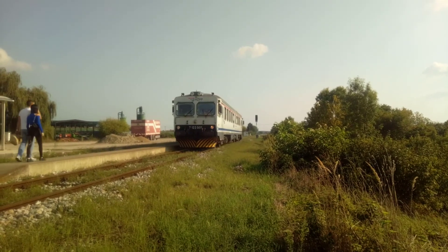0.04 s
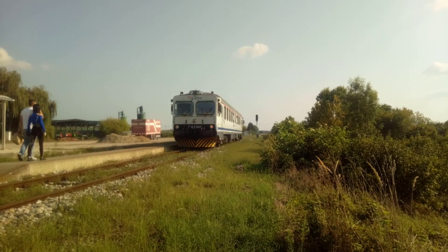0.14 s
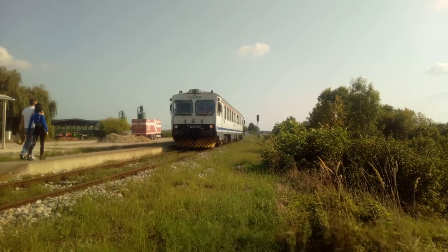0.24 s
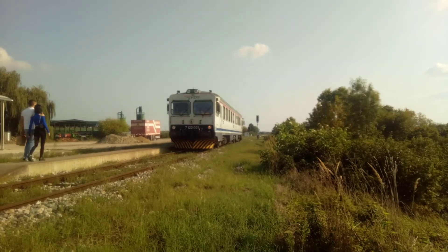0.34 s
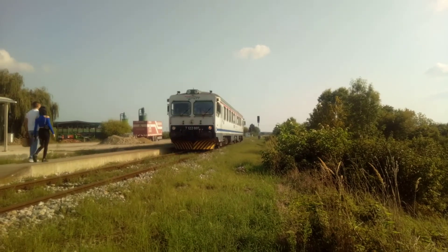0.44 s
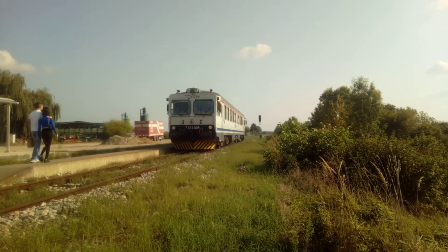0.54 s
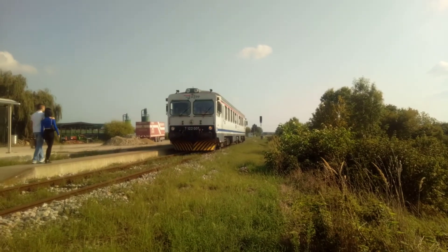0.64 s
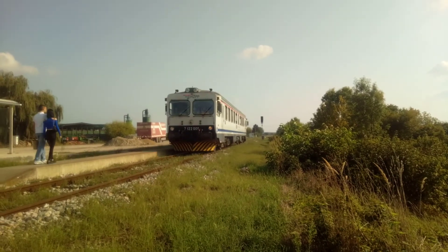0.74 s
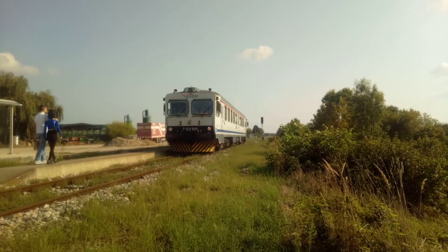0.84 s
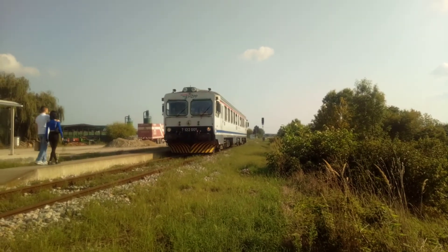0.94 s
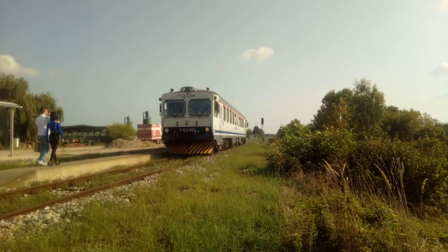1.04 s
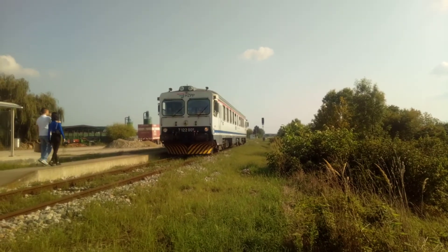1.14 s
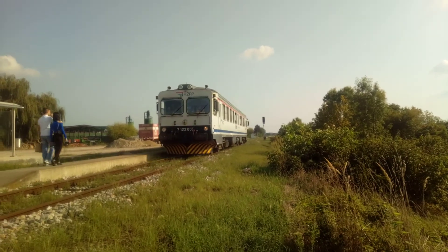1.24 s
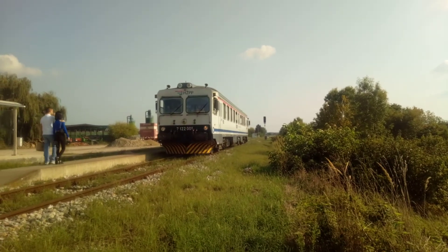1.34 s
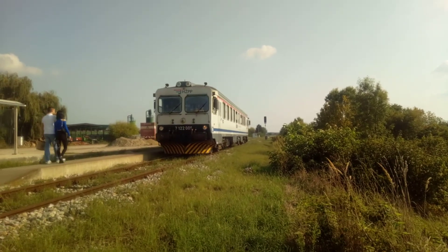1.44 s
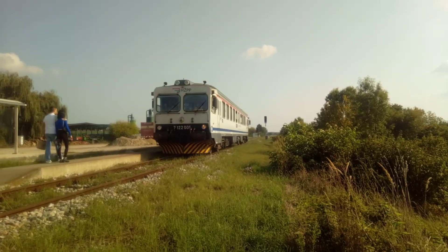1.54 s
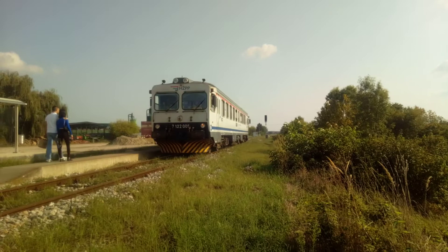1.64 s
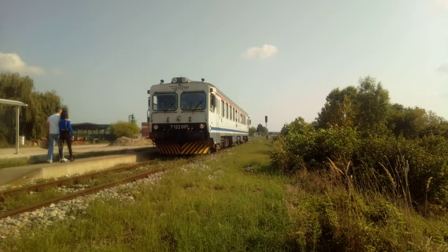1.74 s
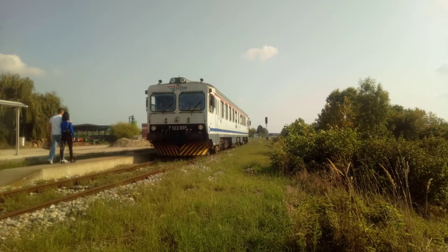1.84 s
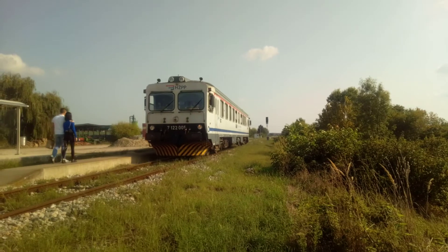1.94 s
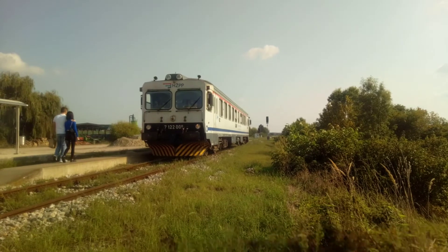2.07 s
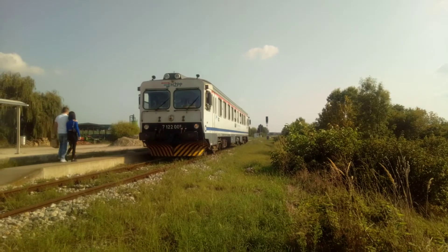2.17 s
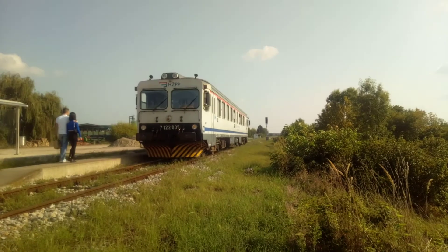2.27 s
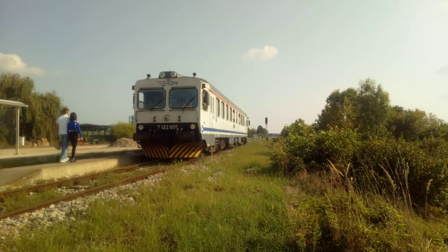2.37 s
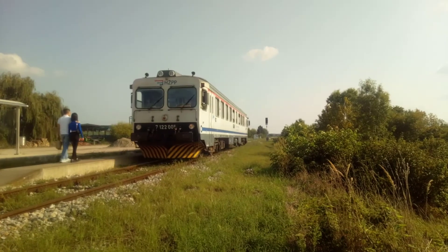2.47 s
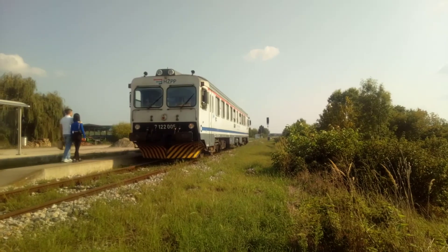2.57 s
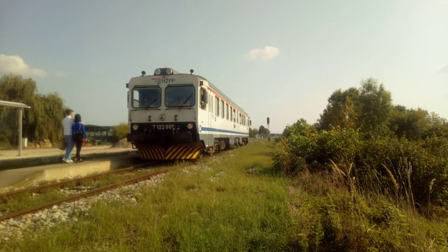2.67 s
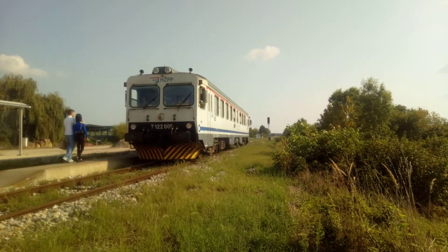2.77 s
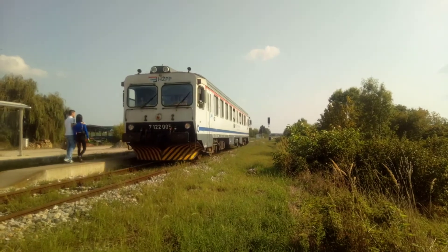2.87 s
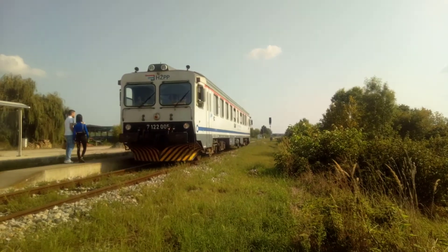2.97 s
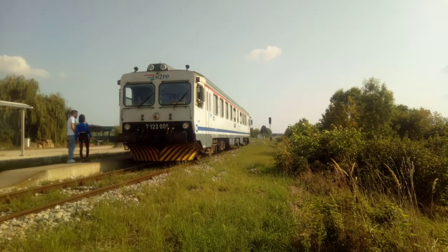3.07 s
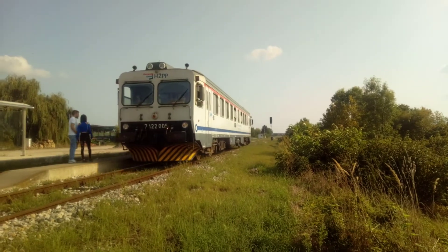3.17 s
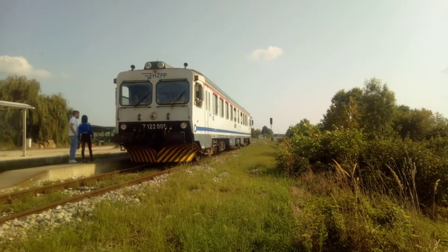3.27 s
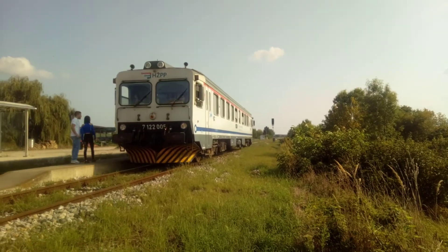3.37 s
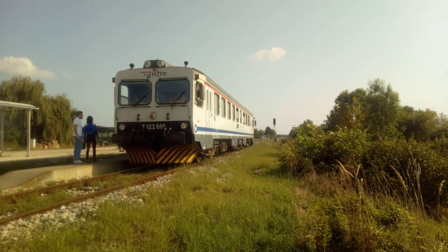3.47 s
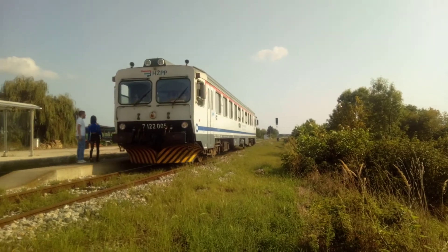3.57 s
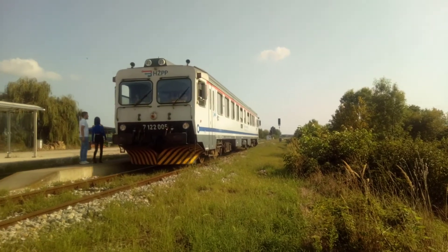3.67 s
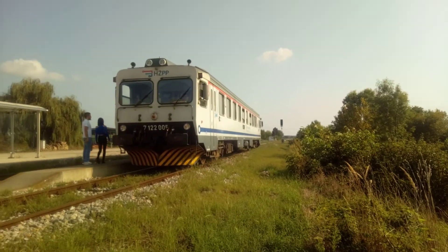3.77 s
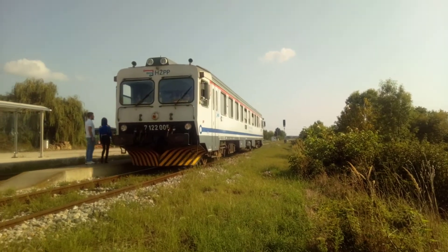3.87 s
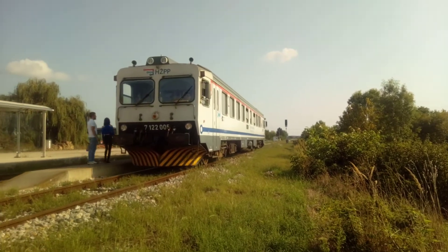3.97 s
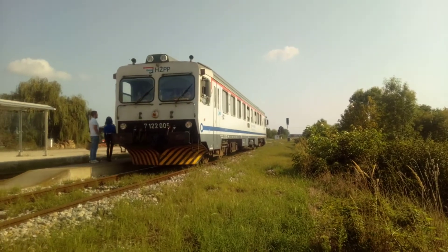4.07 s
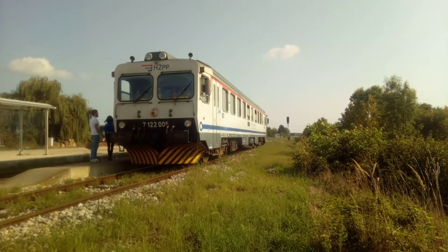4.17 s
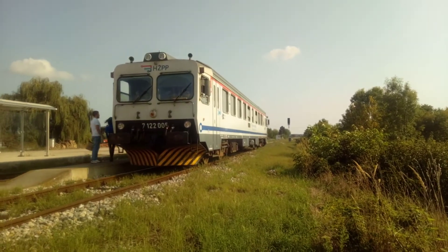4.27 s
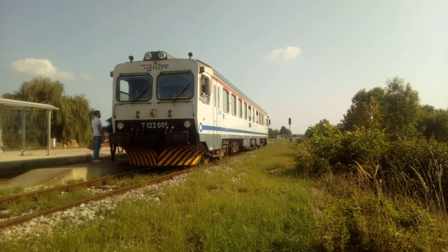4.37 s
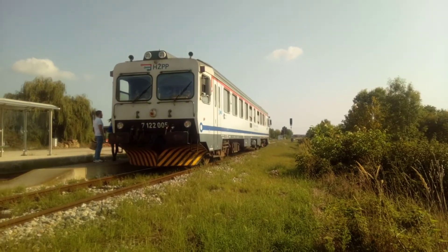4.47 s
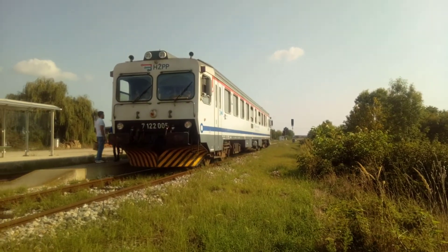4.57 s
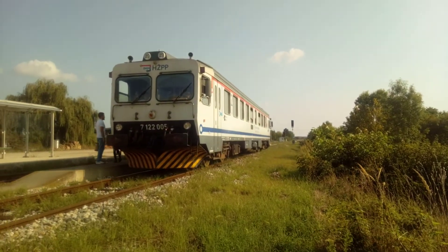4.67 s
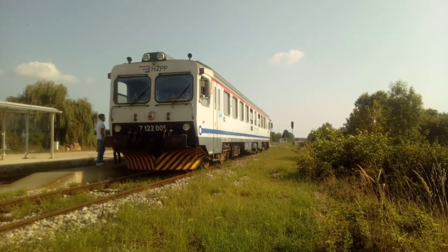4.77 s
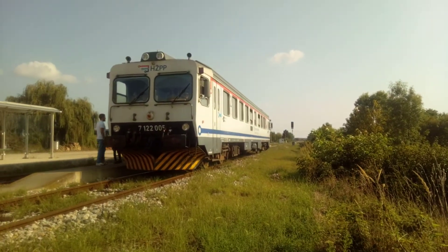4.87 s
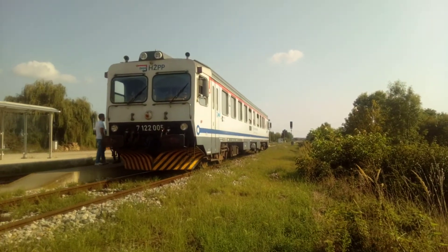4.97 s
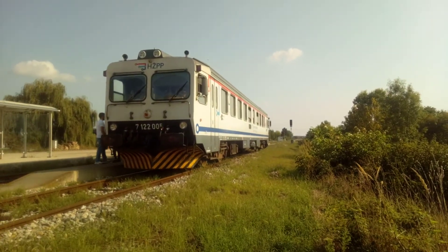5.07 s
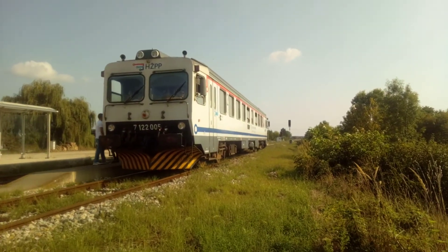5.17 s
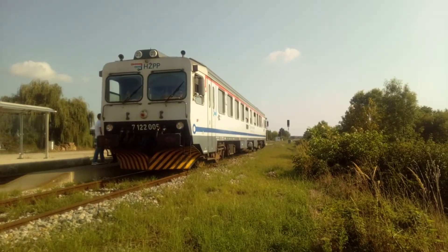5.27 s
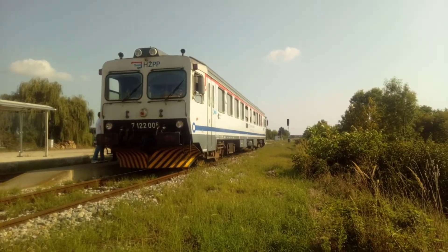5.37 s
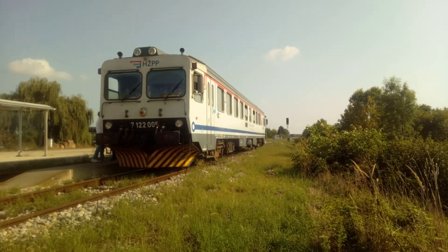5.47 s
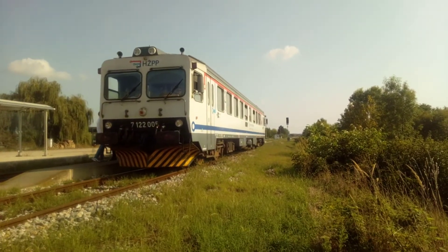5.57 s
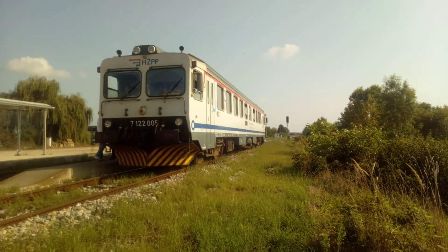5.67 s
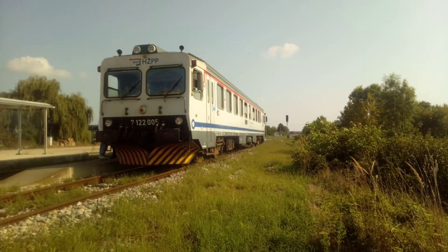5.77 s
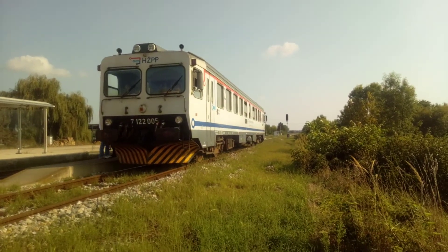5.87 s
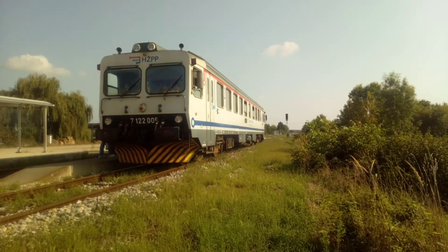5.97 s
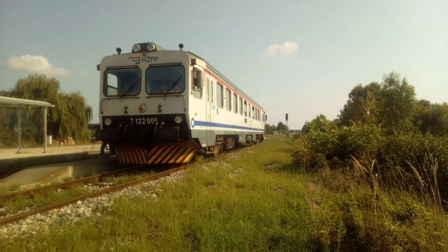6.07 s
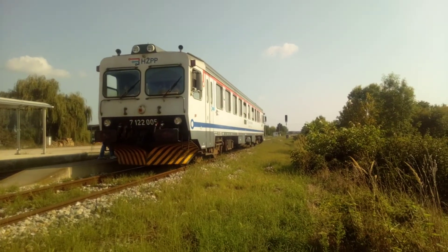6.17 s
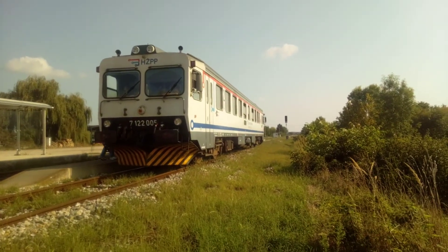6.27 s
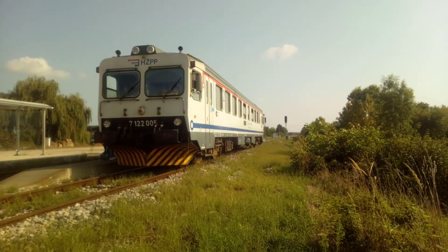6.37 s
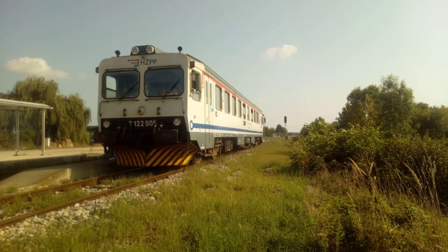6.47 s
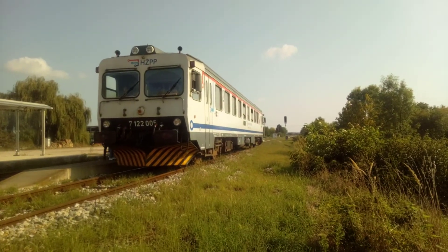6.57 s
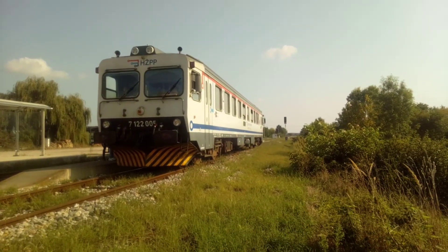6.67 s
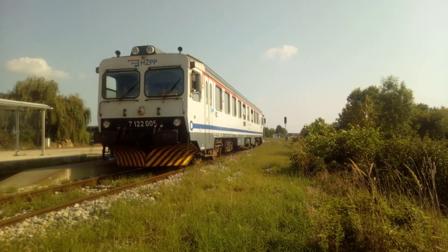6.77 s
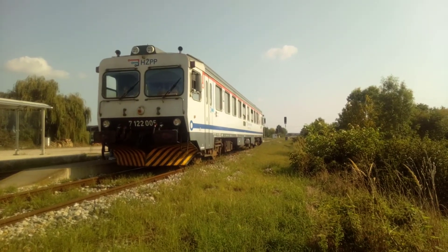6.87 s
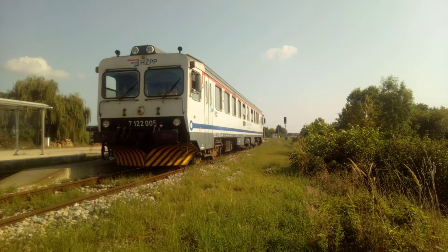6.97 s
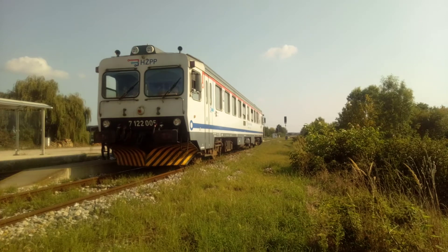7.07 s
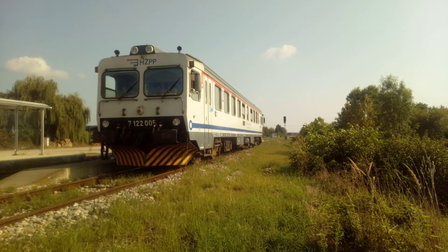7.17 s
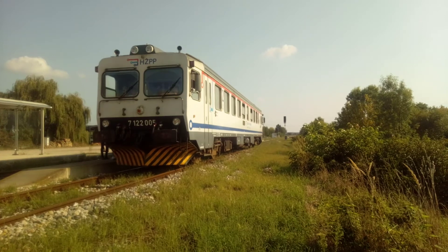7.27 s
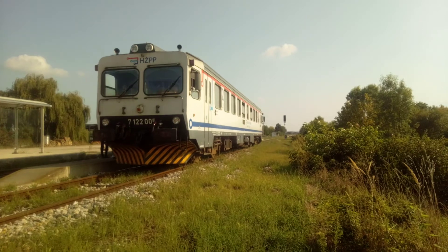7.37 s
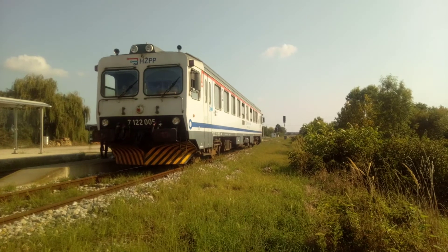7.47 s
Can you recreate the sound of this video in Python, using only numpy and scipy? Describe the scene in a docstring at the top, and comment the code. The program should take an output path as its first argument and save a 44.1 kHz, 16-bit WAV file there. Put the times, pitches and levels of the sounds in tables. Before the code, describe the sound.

Low throbbing diesel engines beneath a harsh, shrill brake squeal that swells, flutters and stops abruptly, leaving fading hiss and a steady hum.

```python
"""Friction-driven squeal of a braking railcar

A diesel railcar rolls up to a country platform, heard from the grass beside the track. Its two engines
run throughout: firing pulses and filtered noise, with a hum of shaft multiples and a thin whine.
Brake blocks ring steel modes with noisy slips and set the wheels squealing as beating tones with
overtones and rasp; moans and short squawks join in, and bleeding air hisses as coloured noise.
Two dull thumps ring low modes during the approach, and dry stalks crack close by as noise bursts."""
import sys
import numpy as np
from scipy import signal
from scipy.fft import rfft, irfft, next_fast_len
from scipy.io import wavfile

SR = 44100
rng = np.random.default_rng(int(sys.argv[2]) if len(sys.argv) > 2 else 0)


def store_pcm(level_fs):
    """Save levels as 16-bit WAV."""
    pcm = np.round(np.clip(level_fs, -1, 1) * 32767).astype(np.int16)
    wavfile.write(sys.argv[1], SR, np.atleast_2d(pcm).T)


N = 331191
T = np.arange(N) / SR
TOP_HZ = 15750  # upper band limit


def undb(db):
    """Logarithmic level: decibels to amplitude gain."""
    return 10 ** (np.asarray(db) / 20)


def curve(rows, axis=1):
    """Linear interpolation: one column of a table, joined by straight lines in time."""
    rows = np.asarray(rows, float)
    return np.interp(T, rows[:, 0], rows[:, axis])


def unit(x):
    """Normalisation: scale to rms 1."""
    return x / np.sqrt(np.mean(np.abs(x) ** 2))


def shape(x, response):
    """Linear filtering: multiply the spectrum by a gain that is a function of frequency."""
    size = next_fast_len(N, True)
    hz = np.arange(size // 2 + 1) * SR / size + 1e-3
    return irfft(rfft(x, size) * response(hz), size)[:N]


def colour(x, points):
    """Spectral envelope: filter by (f/Hz, level/dB) points on a logarithmic f axis; rms 1."""
    hz, db = np.transpose(points)
    return unit(shape(x, lambda f: undb(np.interp(np.log(f), np.log(hz), db))))


def resonance(f, hz, width):
    """Damped oscillator: complex gain of one resonance, 1 at its centre."""
    return 1 / (1 + 1j * (f * f - hz * hz) / (f * width))


def walk(rate):
    """Band-limited chance: random values, `rate` per second, joined by lines; rms 1."""
    steps = rng.standard_normal(int(N / SR * rate) + 4)
    return unit(np.interp(T * rate + rng.random(), np.arange(len(steps)), steps))


def scatter(width_hz, skirt_hz):
    """Random excitation: wandering size and phase of a tone, as low-passed complex noise; rms 1."""
    z = rng.standard_normal(N) + 1j * rng.standard_normal(N)
    for hz in (width_hz / 2, skirt_hz, skirt_hz):
        z = signal.lfilter([1], [1, -np.exp(-2 * np.pi * hz / SR)], z)
    return unit(z)


def turn(hz):
    """Phase accumulation: running phase of a frequency curve."""
    return 2 * np.pi * np.cumsum(hz) / SR


def tone(phase, size=1):
    """Phasor rotation: a sine of rms 1, times a real or complex size."""
    return np.sqrt(2) * np.real(size * np.exp(1j * phase))


SWELL_EDGE = 2.1  # higher gives a flatter top and steeper flanks


def swell(centre_s, length_s):
    """Bell envelope: a rounded rise and fall, 1 at its centre and 0.61 at the ends of its length."""
    return np.exp(-np.abs(2 * (T - centre_s) / length_s) ** SWELL_EDGE / 2)


def underframe(x):
    """Multipath interference: short echoes among steel parts cut fine peaks and notches into a noise."""
    t = T[:SR // 25]
    echoes = rng.standard_normal(len(t)) * np.exp(-t / .015)
    return x + undb(-6.5) * signal.fftconvolve(x, echoes / np.linalg.norm(echoes))[:N]


# exhaust level, for the weighted sum of thud and rumble: t/s, level/dB
ENGINE_LEVEL = [(0, -46), (2.2, -47), (2.8, -49), (7.5, -49.5)]
# relative spectrum of the exhaust rumble: f/Hz, level/dB
ENGINE_COLOUR = [(20, -25), (31, 0.5), (42, -12), (62, 5.5), (80, 6), (105, -2), (140, 1), (215, -3),
                 (270, -9.5), (360, -17.5), (480, -23), (800, -27), (2000, -57)]


def exhaust(cycle):
    """Periodic impulses: six unequal cylinders thud through the silencer over a noisy rumble."""
    fired = np.flatnonzero(np.diff(np.floor(cycle)))
    cylinders_db = np.array([-1.5, -3.5, -1.5, -10.5, -0.5, 1.5])
    firing_db = cylinders_db[np.arange(len(fired)) % len(cylinders_db)]
    pulses = np.zeros(N)
    pulses[fired] = undb(firing_db + 0.67 * rng.standard_normal(len(fired)))
    # the silencer leaves only the lowest few multiples of the firing rate
    thud = unit(shape(pulses, lambda f: resonance(f, 72, 60) ** 2))
    thud_db = -8 + np.interp(T, [5, 5.7], [0, -4])
    rumble = colour(rng.standard_normal(N) * undb(2.0 * walk(24)), ENGINE_COLOUR)
    return undb(curve(ENGINE_LEVEL)) * (undb(thud_db) * thud + undb(0.9) * rumble)


# partials of the second engine's hum: multiple of the shaft rate, level/dB before the swell
HUM = [(5, -70), (6.5, -63.5), (7, -64), (9, -72.5), (10, -78.5), (12, -54), (13, -56.5), (16, -62.5),
       (17, -62.5), (26, -66.5)]
# gain over the whole hum: t/s, level/dB
HUM_SWELL = [(0, -5), (4.4, -14), (5.2, -8), (5.7, 0.5), (7.5, 1)]
SHAFT_HZ, HUM_WAVER_DB = 12.59, 1.6


def hum():
    """Harmonic series: the second engine sounds whole and half multiples of its shaft rate."""
    shaft = turn(SHAFT_HZ * (1 + 0.0021 * walk(5)))
    partials = 0
    for k, db in HUM:
        phase = round(2 * k) / 2 * shaft + 2 * np.pi * rng.random()
        partials += undb(db + HUM_WAVER_DB * walk(4)) * tone(phase)
    return undb(curve(HUM_SWELL)) * partials


# engine clatter: t/s, level/dB
CLATTER = [(0, -50.5), (1.0, -49), (2.3, -47.5), (2.7, -52.5), (5.1, -54), (5.7, -53), (7.5, -54.5)]
# its relative spectrum: f/Hz, level/dB
CLATTER_COLOUR = [(250, -23), (450, -6.5), (750, 1), (900, -4), (1070, 3), (1350, -4), (1570, 1),
                  (2200, -7.5), (2700, -9), (3600, -10), (4500, -13), (6600, -19), (8200, -37), (9700, -36),
                  (13700, -44.5), (15000, -18)]


def clatter(cycle):
    """Amplitude modulation: noise jumps up at each firing and decays within the cycle."""
    gate = (1 + 0.44 * np.exp(-(cycle % 1) / 0.236)) * undb(0.67 * walk(9))
    noise = underframe(rng.standard_normal(N) * gate)
    return undb(curve(CLATTER)) * colour(noise, CLATTER_COLOUR)


# thin whine of the engine: t/s, f/Hz, level/dB
WHINE = [(0, 2706, -65), (1.8, 2670, -53), (2.4, 2672, -63), (5.5, 2637, -60.5), (7.5, 2645, -68.5)]


def whine():
    """Narrow-band noise: a gliding tone of wandering size and phase."""
    return undb(curve(WHINE, axis=2)) * tone(turn(curve(WHINE)), scatter(width_hz=67, skirt_hz=220))


# mean firing rate of the main engine: t/s, f/Hz
FIRING_RATE = [(0, 30.02), (4.8, 30.45), (5.6, 32.33), (7.5, 31.8)]


def engines():
    """Common periodicity: one firing cycle drives exhaust and clatter; hum and whine run beside it."""
    cycle = np.cumsum(curve(FIRING_RATE) * (1 + 0.0043 * walk(4))) / SR
    return exhaust(cycle) + hum() + clatter(cycle) + whine()


# relative spectrum of the escaping air: f/Hz, level/dB
AIR_COLOUR = [(1500, -9), (2650, -7), (3300, -1.5), (4500, -9.5), (5600, -2), (6000, 3.5), (6300, -3),
              (6650, 2), (7200, -9), (8200, -14), (9000, -8.5), (10400, -13.5), (11800, -4), (13700, -8),
              (14700, 4), (15700, -3.5)]
AIR_FULL_S, AIR_ATTACK_S = 5.28, .3  # time of full opening, and the rise before it
AIR_DB, AIR_FALL_DB_PER_S = -45.5, 9.5


def air():
    """Turbulent jet noise: a thin hiss that sinks with the pressure in the brake pipe."""
    since = T - AIR_FULL_S
    opening = np.clip(1 + since / AIR_ATTACK_S, 0, 1)
    db = AIR_DB - AIR_FALL_DB_PER_S * np.maximum(since, 0) + 0.32 * walk(14)
    return opening * undb(db) * colour(underframe(rng.standard_normal(N)), AIR_COLOUR)


# grass brushing close by: t/s, level/dB
RUSTLE = [(0, -100), (7.42, -100), (7.436, -46), (7.51, -49.5)]


def rustle():
    """Random excitation: grass brushes as fluttering coloured noise."""
    spectrum = [(40, -11), (130, 0), (450, 4), (1200, 3), (3500, -4), (9000, -18.5), (15000, -17)]
    grass = colour(rng.standard_normal(N) * undb(1.9 * walk(250)), spectrum)
    return undb(curve(RUSTLE)) * grass


# dull thumps: t/s, peak level/dB, push length/s
THUMPS = [(1.147, -33, 0.0035), (1.16, -22, 0.001), (1.199, -36, .003), (1.212, -33, 0.0016),
          (1.996, -18, 0.0015), (2.036, -25.5, 0.0014)]
# the low modes they ring: f/Hz, relative level/dB, t60/s
THUMP_MODES = [(121.5, -0.5, 0.34), (141, 1.5, 0.19), (223.3, -9, 0.45), (278, 4, 0.12), (410, -17, .07)]


def thumps():
    """Impulse response: soft pushes ring low, decaying modes."""
    out, t = np.zeros(N + SR), T[:SR // 3]
    ring = sum(undb(db - 60 * t / t60) * np.sin(2 * np.pi * hz * t) for hz, db, t60 in THUMP_MODES)
    for s, db, push in THUMPS:
        blow = signal.fftconvolve(ring, np.exp(-np.pi * t / push))[:len(t)]
        out[int(s * SR):][:len(t)] += undb(db) * blow / np.abs(blow).max()
    return out[:N]


# cracks and scuffs close by: t/s, peak level/dB, ring f/Hz, t60/s
CRACKS = [(.196, -32.5, 2750, 0.003), (.228, -29.5, 1880, 0.0079), (0.232, -31, 1690, 0.0096),
          (.242, -40, 2000, 0.018), (.248, -38, 2180, .008), (1.129, -32.5, 1000, 0.075),
          (1.143, -35, 620, 0.12), (1.161, -30.5, 320, 0.29), (1.995, -27, 1480, 0.077),
          (2.026, -31, 1300, 0.034), (4.478, -33, 420, 0.036), (5.526, -29.5, 3100, 0.0097),
          (5.561, -22.5, 1470, 0.02), (5.564, -27.5, 1410, .012), (7.48, -28, 2640, 0.013)]


def cracks():
    """Transient excitation: dry stalks snap as decaying noise through one broad resonance."""
    out, t = np.zeros(N + SR), T[:SR // 3]
    for s, db, hz, t60 in CRACKS:
        burst = rng.standard_normal(len(t)) * undb(-60 * t / t60)
        snap = signal.lfilter(*signal.iirpeak(hz, 1.2, fs=SR), burst)
        # low scuffs carry no treble
        snap = signal.lfilter(*signal.butter(2, min(5 * hz, TOP_HZ), fs=SR), snap)
        out[int(s * SR):][:len(t)] += undb(db) * snap / np.abs(snap).max()
    return out[:N]


# moans of the bogie under braking: centre t/s, length/s, f/Hz, level/dB before MOAN_LIFT_DB
MOANS = [(3.04, 0.14, 1032, -41.5), (3.4, 0.23, 1024, -43.5), (3.963, 0.37, 1053, -40),
         (4.467, 0.16, 1157, -45.5), (4.62, 0.11, 1073, -37.5), (4.92, 0.37, 1033, -39.5),
         (5.212, 0.09, 1022, -42)]
MOAN_LIFT_DB = 2.0


def moan():
    """Low-mode friction vibration: the bogie moans in rough, swelling tones."""
    out = 0
    for s, length, hz, db in MOANS:
        rough_tone = tone(2 * np.pi * hz * T, scatter(width_hz=56, skirt_hz=139))
        out += undb(db + MOAN_LIFT_DB) * swell(s, length) * rough_tone
    return out


# short squawks: centre t/s, length/s, f/Hz at the centre, level/dB before roughening
SQUAWKS = [(3.01, .14, 790, -41), (5.02, .17, 775, -34), (5.09, .11, 725, -39), (5.02, .13, 1560, -36.5),
           (5.01, .17, 2662, -28.5), (5.02, .18, 3560, -30.5), (5.02, .13, 5222, -31),
           (5.02, .13, 6230, -35), (5.27, .25, 668, -45.5), (5.28, .15, 6126, -37.5), (5.2, .14, 2226, -35)]


def squawk():
    """Stick-slip oscillation: single modes squawk as the blocks start to stick."""
    out = np.zeros(N)
    waver, rough = walk(45), 0.6 + 0.6 * scatter(width_hz=50, skirt_hz=157)
    for k, (s, length, hz, db) in enumerate(SQUAWKS):
        i = np.flatnonzero(np.abs(T - s) < length / 2)
        own = (i + k * len(i)) % N  # each reads its own stretch of the waver
        pitch = hz * (1 - 0.07 * (T[i] - s)) + 9 * waver[own]  # sags as the wheel slows
        envelope = np.cos(np.pi * (T[i] - s) / length)
        out[i] += undb(db) * envelope * tone(turn(pitch), rough[own])
    return out


# the brake blocks are pressed on twice: on t/s, off t/s
BRAKINGS = [(.5, 1.98), (2.38, 5.33)]
BITE_S, RELEASE_S, RELEASED_DB = 0.045, .16, -7  # overtones, rasp and rubbing drop while blocks hang loose


def contact_db():
    """Contact force: 0 dB while the blocks are pressed on, less when they are released."""
    pressed = 0
    for on, off in BRAKINGS:
        ramps = np.minimum((T - on) / BITE_S, (off - T) / RELEASE_S)
        pressed += np.clip(ramps + .5, 0, 1)
    return RELEASED_DB * (1 - pressed)


# wheel squeal under the first, light application of the brake: t/s, level/dB
LIGHT_BRAKING = [(0, -56.5), (.44, -57.5), (.62, -38.5), (.8, -44), (1.15, -34), (1.8, -33), (2.15, -51)]
# and under the second, hard one: t/s, level/dB
HARD_BRAKING = [(2.3, -44), (2.38, -38.5), (2.44, -28.5), (2.58, -26.5), (2.74, -18.5), (2.94, -17.5),
                (3.1, -24.5), (3.27, -19), (3.9, -17.5), (4.17, -16), (4.4, -21.5), (4.55, -24.5),
                (4.7, -14.5), (4.96, -22.5), (5.261, -18.5), (5.3, -30), (5.37, -33), (5.461, -52.5),
                (5.7, -63.5)]
SQUEAL = LIGHT_BRAKING + HARD_BRAKING
LOUD_DB = -23.5  # squeal level at which overtones, rasp and rubbing are given


def driven(db, growth):
    """Nonlinear growth: gain of a sound that needs contact and rises by `growth` dB per dB of squeal."""
    return undb(LOUD_DB + db + growth * (curve(SQUEAL) - LOUD_DB) + contact_db())


# resonances of the brake gear: f/Hz, width/Hz, relative level/dB
BRAKE_MODES = [(753, 94, -6.5), (990, 19, -5.5), (1600, 390, -8), (2013, 250, -1), (2447, 74, 1.5),
               (2655, 60, 2), (3065, 140, -1), (3270, 140, -3.5), (3544, 41, -3.5), (3655, 190, -0.5),
               (4670, 90, -4.5), (5210, 73, -9.5), (5710, 180, -1.5), (6156, 67, -2), (6450, 140, -3),
               (6900, 350, -4), (7535, 68, -7.5), (7800, 98, -6.5), (9560, 90, -17), (10030, 49, -13),
               (11100, 30, -18), (12250, 110, -20), (14480, 90, -4.5), (14680, 80, -6.5),
               (15200, 300, -6.5)]


def brake_gear(grain):
    """Modal resonance: dense uneven slips ring the brake gear, each mode coming and going."""
    gear = 0
    for hz, width, db in BRAKE_MODES:
        slips = grain * rng.standard_normal(N)
        ring = shape(slips, lambda f: resonance(f, hz, width) * resonance(f, hz, 4 * width))
        gear += undb(db + 2.66 * walk(13)) * unit(ring)
    return unit(gear)


def scrape(grain):
    """Broadband friction: the same grain roughens a coloured noise with underframe echoes."""
    spectrum = [(550, -60.5), (750, -14), (1300, -1), (1700, 1.5), (2300, -13), (4000, 0.5),
                (6500, -5), (8400, -12.5), (13800, -14.5), (15300, 0.0)]
    return colour(underframe(grain * rng.standard_normal(N)), spectrum)


# the blocks grind in swells as the wheels turn: centre t/s, length/s, drive level/dB
GRINDS = [(2.918, 0.42, -32.5), (3.472, 0.24, -35.5), (3.98, 0.37, -33.5), (4.793, 0.3, -32),
          (5.01, 0.25, -33.5)]
RUB_DB = -22.5  # steady rubbing drive, against the squeal


def grind():
    """Sliding friction: swells and squeal-linked rubbing add in power to drive gear and scrape."""
    grain = undb(1.2 * walk(300) + 2.1 * walk(25))
    swells = sum((undb(db) * swell(s, length)) ** 2 for s, length, db in GRINDS)
    force = np.sqrt(swells + driven(RUB_DB, growth=0.64) ** 2)
    return force * (undb(2.0) * brake_gear(grain) + undb(3.0) * scrape(grain))


def voice(width_hz, loose):
    """Phase diffusion: a loose contact spreads a partial into a narrow cluster with wide, rough skirts."""
    cluster = scatter(width_hz, skirt_hz=89.2)
    skirts = undb(-8) * scatter(width_hz=220, skirt_hz=1200)
    return np.sqrt(1 - loose) + np.sqrt(loose) * (cluster + skirts)


# overtones: multiple, level/dB against the squeal, growth in dB per dB, width/Hz, waver/dB
PARTIALS = [(2, -24.5, 0.77, 53, 2.5), (3, -26.5, 1, 95, 2.4)]


def overtones(phase, share, hard_db):
    """Harmonic distortion: whole multiples of the squeal rise with its level."""
    out = 0
    for k, db, growth, width, waver_db in PARTIALS:
        gain = driven(db + hard_db + waver_db * walk(20), growth)
        out += gain * tone(round(k) * phase, voice(width, loose=share ** .33))
    return out


# rasp at odd halves of the squeal pitch: multiple, width/Hz, relative level/dB
RASP = [(.5, 90, 0.5), (1.5, 85, 2), (2.5, 76, -16.5), (3.5, 110, -6.5)]
RASP_DB, RASP_GROWTH = -17.5, 1.4  # against the squeal; dB gained per dB of squeal
RASP_TOP_DB, RASP_WAVER_DB = -40, 1.8  # the common gain grows no further than the top


def rasp(phase, hard_db):
    """Period doubling: slips on every other cycle add a rasp between the overtones."""
    out = 0
    for k, width, db in RASP:
        partial = tone(round(2 * k) / 2 * phase, scatter(width, skirt_hz=320))
        out += undb(db + RASP_WAVER_DB * walk(9)) * partial
    return np.minimum(driven(RASP_DB + hard_db, RASP_GROWTH), undb(RASP_TOP_DB)) * out


# the pitch sinks and the tone clears:
# t/s, how far pitch and scatter stand above their late values (0-1)
EARLINESS = [(0, 1), (1.3, .95), (2.8, .45), (3.4, .12), (4.2, 0)]
# moments when the tone hardens: centre t/s, length/s, level/dB added to overtones and rasp
HARDENING = [(1.78, 0.18, 4), (2.406, 0.046, 6), (2.7, .16, 6), (5.0, 0.36, 9.5)]
# the wheel briefly loses its grip and the squeal stutters: t/s, dip/dB
STUTTERS = [(2.913, 11), (2.979, 14), (3.025, 12), (3.13, 9.5), (3.271, 7), (3.458, 22), (3.561, 7.5),
            (3.619, 10.5), (3.729, 15), (3.83, 9.5), (3.889, 13), (4.021, 8), (4.4, 5.5), (4.635, 11.5),
            (4.815, 11)]
STUTTER_S = .022  # length of each dip
LATE_HZ, EARLY_RISE_HZ = 4448, 40  # late pitch, and how much higher it starts
LATE_SCATTER, EARLY_SCATTER = .02, .7  # scattered share of the tone, 0-1
FLUTTER_PER_S, FLUTTER_DB = 30, 2.1  # lighter flutter; depth scale, eased as the tone scatters
# how much sharper a second wheel sings, late and early, and its wander
LATE_BEAT_HZ, EARLY_BEAT_HZ, BEAT_WANDER_HZ = 14, 42, 12
OTHER_WHEEL_DB, EARLY_WHEEL_DB = -19, 14  # its late level against the first, and what is added early


def squeal():
    """Self-excited friction vibration: two wheels sing on one mode and beat, with overtones and rasp."""
    early = curve(EARLINESS)
    phase = turn(LATE_HZ + EARLY_RISE_HZ * early + 2 * walk(30))
    share = np.clip(LATE_SCATTER + (EARLY_SCATTER - LATE_SCATTER) * early ** 2, 0, 1)
    beat_hz = LATE_BEAT_HZ + (EARLY_BEAT_HZ - LATE_BEAT_HZ) * early + BEAT_WANDER_HZ * walk(12)
    other_wheel = undb(OTHER_WHEEL_DB + EARLY_WHEEL_DB * early) * np.exp(1j * turn(beat_hz))
    # friction caps the swing, so the flutter has round tops and sharp dips
    slip = np.logaddexp(0, 2 * walk(FLUTTER_PER_S))
    flutter = unit(undb(-FLUTTER_DB * slip * np.sqrt(1 - share)))
    stutter_db = sum(db * swell(s, STUTTER_S) for s, db in STUTTERS)
    wheels = tone(phase, voice(width_hz=112, loose=share) + other_wheel)
    fundamental = undb(curve(SQUEAL) - stutter_db) * flutter * wheels
    hard_db = sum(db * swell(s, length) for s, length, db in HARDENING)
    return fundamental + overtones(phase, share, hard_db) + rasp(phase, hard_db)


FRICTION_LOW_HZ = 600  # low cut of the grinding, moans and squawks: they are thin below this


def scene():
    """Superposition: all sources add at one microphone in the open air."""
    background = engines() + air() + rustle() + thumps() + cracks()
    friction = grind() + moan() + squawk()
    brakes = shape(friction, lambda f: 1 / np.hypot(1, (FRICTION_LOW_HZ / f) ** 10))
    ring_out = np.interp(T, [5.65, 6.0], [1, 0])  # the wheels fall silent
    return (background + brakes + ring_out * squeal())[None]


def record(dry):
    """Band limiting: a steep low-pass removes the treble above TOP_HZ."""
    return signal.sosfilt(signal.ellip(12, .1, 80, TOP_HZ, fs=SR, output="sos"), dry)


dry = scene()
out = record(dry)
store_pcm(out)
```